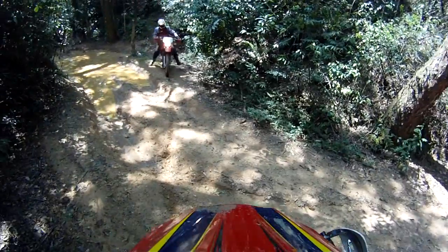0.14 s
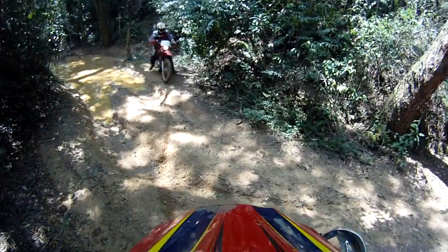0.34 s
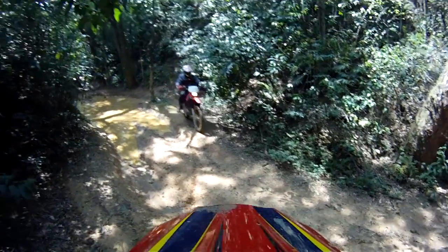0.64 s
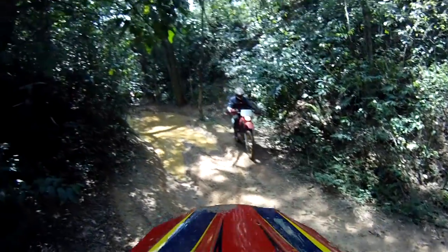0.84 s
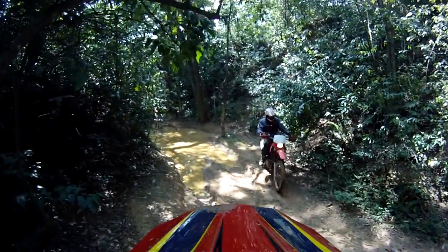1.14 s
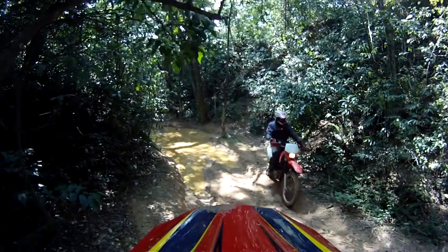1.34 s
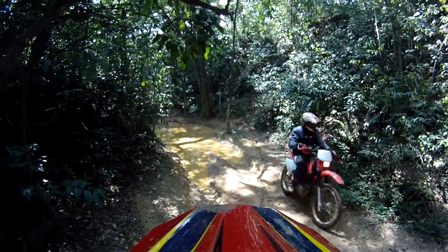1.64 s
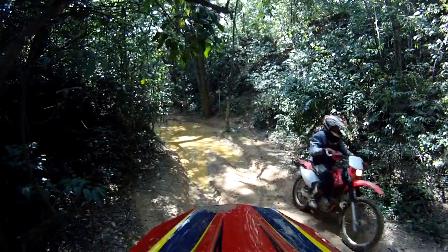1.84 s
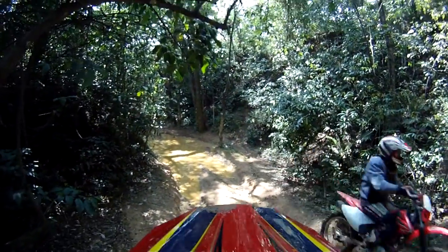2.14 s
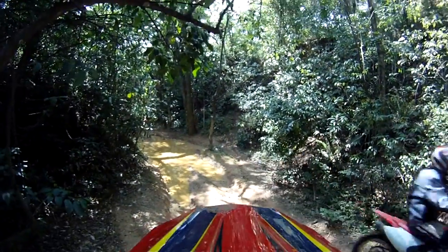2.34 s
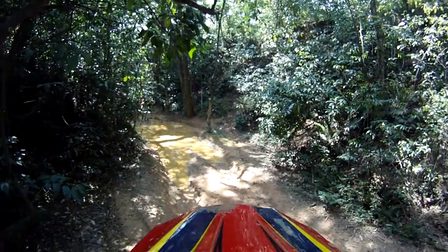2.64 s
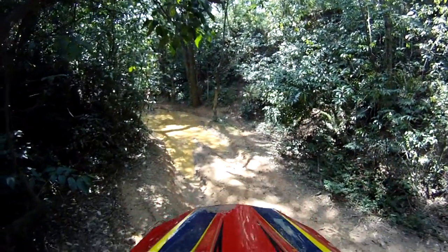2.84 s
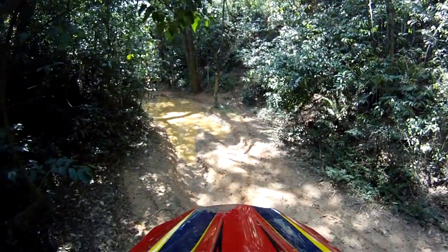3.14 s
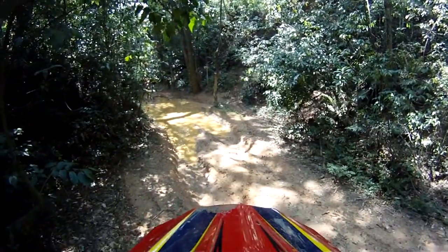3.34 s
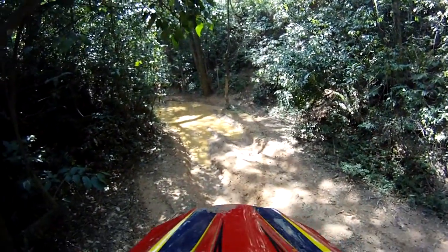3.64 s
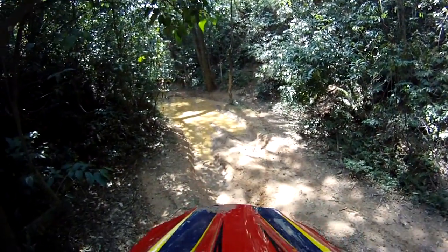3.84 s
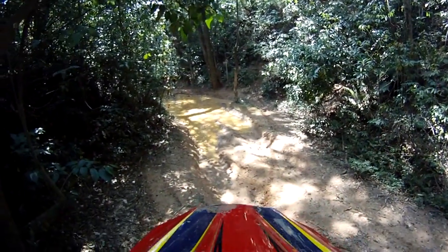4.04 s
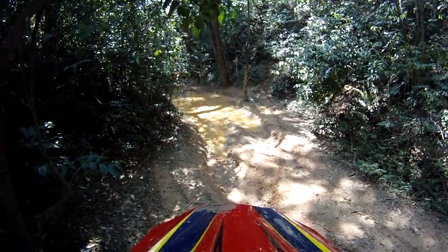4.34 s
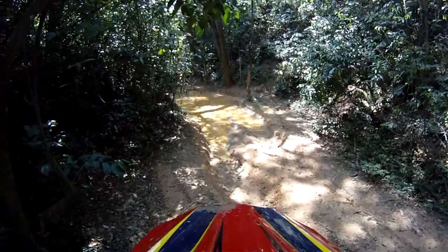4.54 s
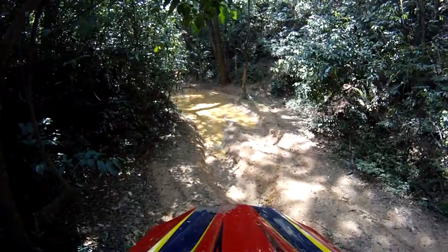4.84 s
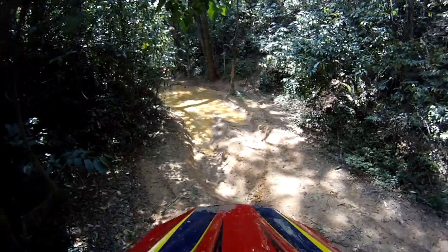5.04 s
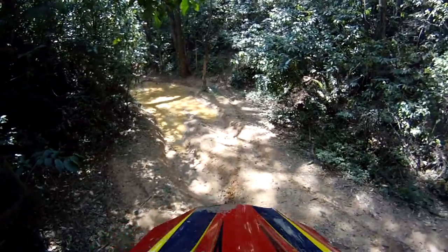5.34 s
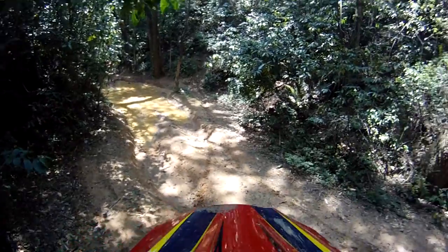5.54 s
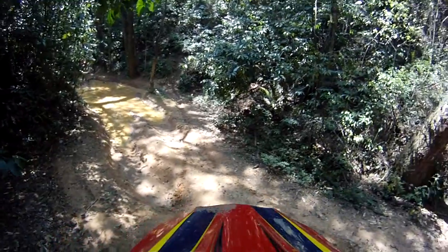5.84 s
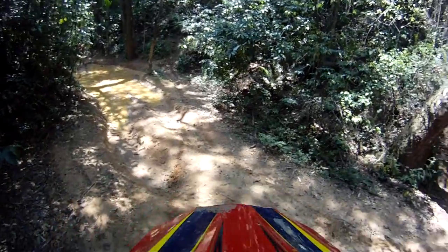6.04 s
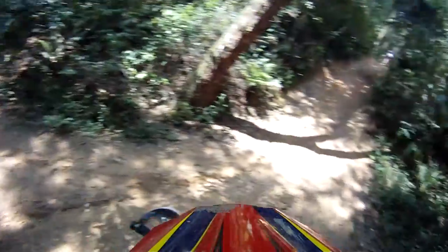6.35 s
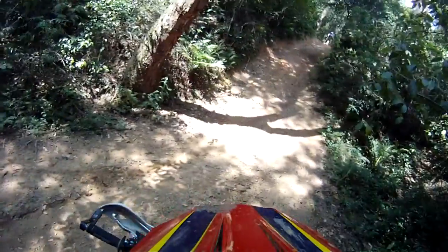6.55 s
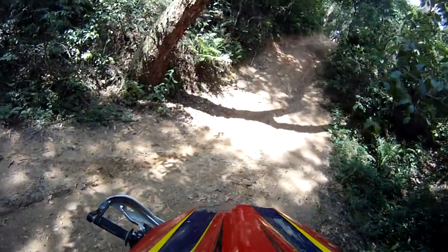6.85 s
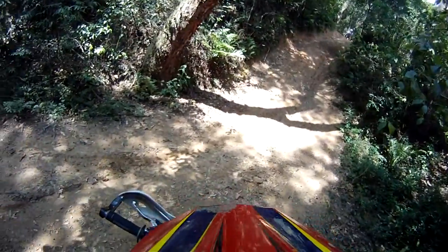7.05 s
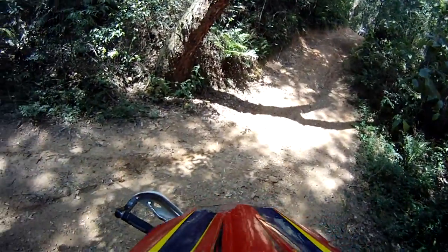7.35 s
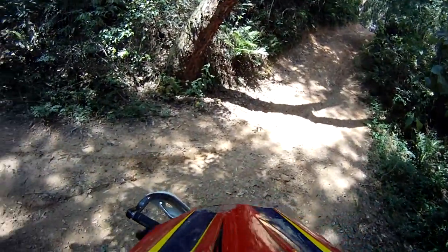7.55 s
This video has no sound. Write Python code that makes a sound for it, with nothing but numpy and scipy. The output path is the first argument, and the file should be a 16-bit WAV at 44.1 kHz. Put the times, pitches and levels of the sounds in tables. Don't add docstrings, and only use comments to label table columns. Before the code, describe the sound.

A muffled, boxy helmet microphone on a forest trail, with faint leafy hiss. From 0 to 0.4 s, low booming bumps and dry clicks shake the casing, strongest near 0.3 s. Beneath them a single-cylinder dirt bike drones low and uneven, dipping, then rising in pitch as it approaches from about 1 s. At 2.2 s a deep thump lands as it passes; immediately the exhaust opens into thudding, barking pulses, with softer bumps until 3 s. The engine holds around 3.3 s, then swells to a loud raspy full-throttle burst at 3.8-4.4 s. The throttle snaps shut, gears whir briefly, a small blip comes near 4.9 s, and the engine slows and recedes. Bumps return at 5.4 s, and a hard cluster of knocks and clicks with a tiny squeak comes around 5.9-6.1 s. Near quiet follows, then faint distant revs at 7 and 7.3 s, with a last blip at the end.

```python
import sys
import numpy as np
from scipy import signal
from scipy.fft import rfft, irfft, next_fast_len
from scipy.io import wavfile
from scipy.ndimage import uniform_filter1d, map_coordinates

SR = 44100
rng = np.random.default_rng(int(sys.argv[2]) if len(sys.argv) > 2 else 0)


def store_pcm(level_fs):
    pcm = np.round(np.clip(level_fs, -1, 1) * 32767).astype(np.int16)
    wavfile.write(sys.argv[1], SR, np.atleast_2d(pcm).T)


def volts(x):
    e = np.asarray(x, float) / 20
    return 10 ** e


N = 338688

# frequency_hz, density_db_per_hz
WOODS_HISS = [(71, -28), (120, -14), (196, -6.5), (294, -4.5), (341, -7.5), (1230, -17.5), (2180, -13),
              (2790, -22.5), (5100, -22.5), (5900, -28.5), (7670, -72), (13000, -120)]
# frequency_hz, t60_s
FOREST_DECAY = [(200, 0.54), (2000, 0.22), (6000, 0.095)]

# start_s, peak_db, pitch_hz, swell_ms
JOLTS = [(0.047, -32, 85.8, 48), (0.101, -25, 84, 24), (0.242, -19, 91.3, 15), (0.315, -8.5, 85.3, 11.7),
         (2.206, -5, 80.7, 10), (2.7, -22.5, 84.4, 15), (2.912, -22, 80, 15), (2.989, -17.5, 83.4, 13),
         (5.422, -16.5, 74, 11.3), (5.498, -44, 77, 12), (5.656, -26.5, 95.5, 14.7), (5.805, -29, 75.4, 13),
         (5.92, -20.5, 67.3, 17), (5.956, -14, 71.6, 10.5), (5.994, -11, 88.7, 11.6),
         (6.05, -29, 101.2, 29), (6.075, -7.5, 86, 9.1), (6.493, -60, 83.4, 8.5), (6.955, -43.5, 86.1, 12),
         (7.131, -46, 85.5, 15), (7.202, -41, 81, 12), (7.443, -47, 83.9, 18), (7.599, -41.5, 72.7, 14)]
# start_s, peak_db, pitch_hz, swell_ms
CASE_TAPS = [
    (.314, -29.5, 278, 4.1),
    (2.206, -27.5, 256, 6.4),
    (5.93, -59, 420, 9.6),
    (6.03, -26, 184.3, 23),
    (6.038, -37.5, 260.6, 24),
]
# start_s, peak_db, t60_s, treble_edge_db
CLICKS = [(0.068, -22, 0.015, -38), (0.105, -29, 0.018, -25), (0.217, -31.5, 0.062, -16),
          (0.248, -23, 0.03, -34), (0.317, -26.5, 0.067, -46), (0.329, -24.5, 0.021, -23),
          (0.35, -39.5, 0.46, -30), (2.206, -20, 0.045, -22), (5.742, -41, 0.054, -22),
          (5.955, -31.5, 0.018, -37), (5.974, -28, 0.035, -40), (5.989, -52, 0.018, -30),
          (6.014, -37, 0.031, -31), (6.033, -18, 0.016, -33), (6.042, -33, 0.07, -38),
          (6.053, -6.5, 0.028, -49), (6.065, -24, 0.024, -26), (6.071, -12, 0.013, -42),
          (6.086, -50, 0.016, -27), (6.097, -36, 0.018, -29)]
# frequency_hz, width_hz, level_db
MOUNT_MODES = [(530, 710, -3), (1300, 1400, -1), (2320, 850, 2.5), (3900, 250, -16)]
# start_s, length_s, pitch_hz, level_db
STRAP_SQUEAK = (5.899, .011, 2120, -42)
# centre_s, half_length_s, case_hum_db, slow_sway_db
HEAD_TURNS = [(0.097, 0.23, -32, -52), (0.331, 0.074, -21.5, -54), (1.197, 2.6, -49, -71),
              (2.25, 0.067, -45, -32), (2.47, 0.15, -32, -40), (2.592, 0.28, -37.5, -50),
              (3.015, 0.32, -47, -49), (3.358, 0.058, -62, -50), (4.456, 0.049, -62, -61),
              (4.76, 0.56, -50, -61), (5.453, 0.34, -40, -53), (5.795, 0.21, -64, -44.5),
              (6.015, 0.092, -17.5, -43), (6.54, 0.37, -65, -59), (6.958, 0.12, -63, -50.5),
              (7.23, 0.099, -68, -53), (7.449, 0.22, -59, -70), (7.68, 0.15, -68, -53)]

# time_s, firings_per_s
FIRING_RATE = [(0.0, 20.72), (0.6, 18.92), (1.19, 23.9), (1.64, 33.26), (2.24, 30.61), (2.37, 39.5),
               (2.63, 50.56), (2.79, 47.55), (3.41, 52.49), (3.59, 50.53), (3.84, 53.92), (4.01, 61.7),
               (4.34, 62.66), (4.62, 57.07), (4.76, 43.09), (4.92, 46.61), (5.46, 28.76), (6.2, 23.1)]
# time_s, firings_per_s
FAR_FIRING_RATE = [
    (6.299, 35),
    (6.951, 41),
    (7.1, 60),
    (7.302, 73),
    (7.5, 62),
    (7.68, 51),
]
# opens_s, rise_s, hold_s, fall_s, lift_db
THROTTLE_TWISTS = [
    (2.264, 0.057, 0.765, 0.22, 10.5),
    (2.36, .38, 0.062, 0.3, 5.5),
    (3.385, 0.17, .03, 0.076, 3),
    (3.735, 0.21, 0.43, 0.042, 9.5),
    (4.771, 0.18, 0.051, 0.043, 7.5),
    (6.955, 0.12, 0.067, 0.15, 15),
    (7.275, 0.082, 0.07, 0.14, 12.5),
    (7.61, .08, 0.11, .1, 5.5),
]
# time_s, echo_delay_ms, exhaust_facing_0_to_1, tailpipe_focus_hz, focus_share_0_to_1
PATH = [(0, 4, 0.22, 2300, 0.18), (2.2, 3.8, .05, 2300, 0.53), (2.35, 2.86, 0.54, 1500, 0),
        (2.55, 3.04, 0.47, 1330, 0.32), (2.75, 2.37, 0.84, 1680, 0.33), (3.03, 2.24, 1, 1820, 0.35),
        (3.14, 2.6, 0.78, 1600, 0.38), (3.3, 2.3, 0.68, 1500, 0.06), (3.55, 2.2, .77, 1190, 0.2),
        (3.97, 2.23, 0.92, 1950, 0.01), (4.39, 2.22, 0.78, 1830, .45), (4.45, 2.58, 0.58, 940, 0),
        (4.98, 2.2, 0.7, 860, 0.11), (5.1, 2.18, 0.8, 2300, 0.47), (5.8, 2.07, 0.76, 2300, 0.4),
        (6.05, 2.3, 0.36, 2300, 0), (7.2, 2.05, 0.42, 1400, .02)]
# time_s, level_db
SHUT_BARK = [(0, -43), (.2, -48), (.45, -51.5), (1, -50), (2.18, -43.5), (2.26, -44.5), (3.3, -36),
             (3.7, -35), (4.43, -36), (4.62, -47), (4.75, -51.5), (5.1, -48.5), (5.45, -54.5), (5.9, -62),
             (6.2, -69), (6.9, -77), (7.27, -64.5), (7.68, -57)]
# frequency_hz, density_db_per_hz
PIPE = [(25, -44), (55, -1), (120, 5.5), (190, -12), (300, -4), (400, -21), (600, -19), (900, -11),
        (1200, -46), (2000, -120)]
# frequency_hz at middle speed, level_db
INTAKE = [(40, -14), (80, -7), (105, -7.5), (140, 6), (165, -4), (200, -15), (260, -7.5), (320, -14.5),
          (420, -12), (650, -28.5)]
# frequency_hz, width_hz, level_db
CASE_MODES = [(1168, 790, 0), (1482, 142, 5.5), (1946, 470, -0.5), (2708, 510, -7.5), (3260, 340, -10),
              (4930, 430, -34), (5470, 160, -50)]
FOCUS_BANDS = [850, 1250, 1800, 2400]
# frequency_hz, width_hz, level_db
METAL_MODES = [(2300, 160, 10.5), (3680, 297, 2.5), (4580, 170, -6.5), (5350, 230, -6.5)]
# frequency_hz, width_hz, level_db
WHIR_MODES = [(1230, 160, -15), (1720, 140, -3), (2710, 170, -3), (4340, 550, -7), (5350, 230, 2)]
# multiple_of_firing_rate, level_db
GEAR_MESH = [(21, -5.5), (26, 2), (30, 0), (33, 5), (40, 0), (46, -4), (77, -19), (90, -22)]
# rise_s, hold_s, fall_s, level_db
COASTING = (0.07, .175, 0.07, -41)
# rise_s, hold_s, fall_s, level_db over the thud
TAIL_RING = (0.041, 1.147, .2, 3.2)
# rise_s, hold_s, fall_s, level_db over the bark there
RASP = (.12, .2, .22, 3)
# rise_s, hold_s, fall_s, level_db over the thud
THIRD_ORDER = (1, .62, -1, -7)

TAIL_BY_S, FULL_THROTTLE_S, COAST_S = 2.25, 3.85, 4.395


def unit(x):
    return x / np.sqrt(np.mean(x ** 2) + 1e-20)


def steady(x, seconds):
    power = uniform_filter1d(x ** 2, int(seconds * SR))
    return x / np.sqrt(np.abs(power) + 1e-12)


def along(points, hz):
    f, value = np.transpose(points)
    return np.interp(np.log(hz + 1), np.log(f + 1), value)


def curves(rows):
    s, *columns = np.transpose(rows)
    return [np.interp(np.arange(N) / SR, s, column) for column in columns]


def swell(s, rise, hold, fall):
    return np.interp(np.arange(N) / SR, np.cumsum([s, rise, hold, fall]), [0, 1, 1, 0])


def wobble(rate):
    knots = rng.standard_normal(int(N * rate / SR) + 4)
    return map_coordinates(knots, [np.arange(N) * rate / SR])


def noise():
    return rng.standard_normal(N)


def filtered(x, response):
    m = next_fast_len(N + SR // 2)
    return irfft(rfft(x, m) * response(np.fft.rfftfreq(m, 1 / SR)), m)[:N]


def causal(points):
    def response(hz):
        cepstrum = irfft(np.log(volts(along(points, hz)) + 1e-6))
        half = len(cepstrum) // 2
        cepstrum[1:half] *= 2
        cepstrum[half + 1:] = 0
        return np.exp(rfft(cepstrum))
    return response


def modes(table):
    def response(f):
        total = 0
        for k, (centre, width, db) in enumerate(table):
            damping = 1j * f * width
            total = total + (-1) ** k * volts(db) * damping / (centre * centre - f * f + damping)
        return total
    return response


def forest(x):
    hz, t, z = signal.stft(rng.standard_normal(SR // 2), SR, nperseg=256)
    decay = volts(-60 * t / along(FOREST_DECAY, hz)[:, None])
    tail = signal.istft(z * decay, SR, nperseg=256)[1]
    delayed = np.pad(x, (300, 0))
    return signal.fftconvolve(delayed, tail / np.linalg.norm(tail))[:N]


def woods():
    return volts(-62.5) * unit(filtered(noise(), causal(WOODS_HISS)))


def case_shaking():
    t = np.arange(N) / SR
    gains = volts(-66)
    for s, half_length, hum_db, sway_db in HEAD_TURNS:
        loss_db = 19 * abs(t - s) / half_length
        gains = gains + volts(np.array([[hum_db], [sway_db]]) - loss_db)
    hum = filtered(filtered(noise(), modes([(82.5, 27.6, 0)])), modes([(80.0, 101, 0)]))
    sway = filtered(filtered(noise(), modes([(27.2, 44, 0)])), modes([(28, 59, 0)]))
    return gains[0] * unit(hum) + gains[1] * unit(sway)


def mount_clicks():
    clicks, ticks, t = np.zeros(N + SR), np.zeros(N + SR), np.arange(SR // 4) / SR
    for s, db, t60, edge_db in CLICKS:
        burst = rng.standard_normal(len(t))
        start = round(s * SR)
        clicks[start:][:len(t)] += volts(db + 6.5 - 60 * t / t60) * burst
        ticks[start:][:len(t)] += volts(db + edge_db + 14 - 60 * t / 0.0099) * burst
    ring = filtered(filtered(clicks[:N], modes(MOUNT_MODES)), modes(MOUNT_MODES))
    return ring + filtered(ticks[:N], modes([(4500, 2500, 0)]))


def case_booms():
    booms, t = np.zeros(N + SR), np.arange(SR // 4) / SR
    for s, db, hz, swell_ms in [*JOLTS, *CASE_TAPS]:
        u = t * 1000 / swell_ms
        envelope = (u * np.exp(1 - u)) ** 1.12
        booms[round(s * SR):][:len(t)] -= volts(db) * envelope * np.sin(2 * np.pi * hz * t)
    s, length, hz, db = STRAP_SQUEAK
    envelope = np.exp(-((t - length) / (0.55 * length)) ** 2)
    booms[round(s * SR):][:len(t)] += volts(db) * envelope * np.sin(2 * np.pi * hz * t * (1 + 2.5 * t))
    return booms[:N]


def helmet():
    return case_booms() + mount_clicks() + case_shaking()


def shaft_noise(turns, facing):
    beat = 1 + 0.36 * facing * np.cos(2 * np.pi * turns) + 0.15 * np.cos(4 * np.pi * turns)
    return beat * noise()


def metal_clatter(turns, facing):
    return unit(filtered(shaft_noise(turns, facing), modes(METAL_MODES)))


def coasting_whir(turns, facing):
    wide = [(hz, 3 * width, 0) for hz, width, _ in WHIR_MODES]
    gear_noise = filtered(filtered(shaft_noise(turns, facing), modes(WHIR_MODES)), modes(wide))
    mesh = 0
    for k, db in GEAR_MESH:
        mesh = mesh + volts(db) * (.8 + .6 * wobble(30)) * np.sin(2 * np.pi * k * turns)
    return unit(gear_noise) + volts(-1.5) * unit(mesh)


def blast_train(rate, turns):
    fired = np.flatnonzero(np.diff(np.floor(turns)))
    time_luck, level_luck = rng.standard_normal((2, len(fired)))
    uneven_db = .8 + .15 * np.maximum(40 - rate[fired], 0)
    blasts = np.zeros(N)
    blasts[np.clip(fired + (3 * time_luck).astype(int), 0, N - 1)] = volts(uneven_db * level_luck)
    return blasts


def intake_drone(rate, turns):
    drift = [volts(2.2 * wobble(3)) for _ in range(5)]
    slow_rate = rate[::64]
    lifted = slow_rate * (25 / slow_rate) ** 0.55
    orders = 0
    for k in range(2, 26):
        gain = np.repeat(volts(along(INTAKE, k * lifted)), 64)[:N]
        phase = 2 * np.pi * (k * turns + rng.standard_normal())
        orders = orders + drift[k % 5] * gain * np.sin(phase)
    return steady(orders, 0.064)


def exhaust_thud(blasts, rate, turns, facing):
    pipe = steady(filtered(blasts, causal(PIPE)), .15)
    approaching = np.arange(N) < TAIL_BY_S * SR
    drone_share = np.where(approaching, 1, 0.47)
    thud = facing * pipe + (1 - facing) * drone_share * intake_drone(rate, turns)
    *shape, db = TAIL_RING
    ring = steady(filtered(blasts, modes([(302.3, 92, 0)])), .15)
    thud = thud + volts(db - 8.5) * swell(TAIL_BY_S, *shape) * ring
    *shape, db = THIRD_ORDER
    thud = thud + volts(db) * swell(FULL_THROTTLE_S, *shape) * np.sin(2 * np.pi * 3 * turns)
    return steady(thud + volts(-12) * forest(thud), .15)


def muffler_chirp(f):
    spread_ms, knee_hz, early_ms = 2.545, 1774, 1.599
    phase = spread_ms * (np.hypot(f, knee_hz) - knee_hz) - early_ms * f
    return np.exp(-2j * np.pi / 1000 * phase)


def gas_turbulence(blasts, facing, bark_ms):
    now = np.arange(N)
    last = np.maximum.accumulate(np.where(blasts > 0, now, 0))
    age = (now - last) / (SR / 1000 * bark_ms)
    gate = facing * blasts[last] * age * np.exp(1 - age) + (1 - facing) * .5
    return steady(gate * noise(), 0.038)


def ground_echoes(bark, facing, echo_ms):
    now = np.arange(N)
    delay = (echo_ms + .05 * wobble(7)) * SR / 1000
    ground = facing * np.interp(now - 0.922 * delay, now, bark)
    bank = facing * np.interp(now - 2.7 * delay, now, bark)
    return bark + 0.69 * ground + 0.41 * bank


def tailpipe_beam(bark, focus_hz, focus):
    place = np.interp(focus_hz, FOCUS_BANDS, np.arange(len(FOCUS_BANDS)))
    beam = 0
    for k, hz in enumerate(FOCUS_BANDS):
        beam = beam + np.clip(1 - abs(place - k), 0, 1) * filtered(bark, modes([(hz, 0.16 * hz, 0)]))
    return (1 - focus) * bark + focus * 4.2 * beam


def exhaust_bark(blasts, rate, load_db, bark_db):
    echo_ms, facing, focus_hz, focus = curves(PATH)
    rough = 1 - facing ** 2 * (.45 + .045 * load_db) + .03 * np.maximum(rate - 50, 0)
    rough = np.clip(rough, 0, 1)
    bark_ms = np.clip(2 * np.exp(-.075 * (bark_db + 35)), .4, 6)
    pulses = filtered(blasts, modes([(1500, 6100, 0)]))
    pulses = filtered(pulses, lambda f: muffler_chirp(f) * modes([(1600, 2600, 0)])(f))
    bark = np.sqrt(1 - rough) * steady(pulses, 0.12)
    bark = bark + np.sqrt(rough) * gas_turbulence(blasts, facing, bark_ms)
    bark = filtered(ground_echoes(bark, facing, echo_ms), modes(CASE_MODES))
    bark = tailpipe_beam(bark, focus_hz, focus)
    *shape, db = RASP
    rasp = filtered(bark, modes([(3220, 630, 0.012)]))
    bark = bark + volts(db) * swell(FULL_THROTTLE_S, *shape) * rasp
    return steady(bark + volts(-14) * forest(bark), .12)


def bike():
    flywheel_s = .08
    rate = uniform_filter1d(curves([*FIRING_RATE, *FAR_FIRING_RATE])[0], int(flywheel_s * SR))
    turns = np.cumsum(rate) / SR + .17
    facing = curves(PATH)[1]
    load_db = sum(db * swell(*shape) for *shape, db in THROTTLE_TWISTS)
    shut_db = curves(SHUT_BARK)[0]
    bark_db = shut_db + load_db
    thud_db = -40.5 + .85 * (shut_db + 35) + 0.61 * load_db + 7 * swell(-1.05, 0.92, 1.21, 0.6)
    clatter_db = -44 + 0.73 * (bark_db + 36)
    *shape, whir_db = COASTING
    whir_gain = volts(whir_db) * swell(COAST_S, *shape) ** 2
    blasts = blast_train(rate, turns)
    mix = whir_gain * coasting_whir(turns, facing)
    mix = mix + volts(clatter_db) * metal_clatter(turns, facing)
    mix = mix + volts(thud_db) * exhaust_thud(blasts, rate, turns, facing)
    return mix + volts(bark_db - 0.85) * exhaust_bark(blasts, rate, load_db, bark_db)


def scene():
    return (woods() + helmet() + bike())[None]


def roll_off(x):
    return signal.sosfilt(signal.butter(12, 15950, fs=SR, output="sos"), x)


def record(dry):
    held_hz, hold = 12000, 4
    power = uniform_filter1d(dry ** 2, int(0.0565 * SR), origin=int(0.02 * SR))
    loudness = np.sqrt(np.abs(power))[0]
    x = dry[0] / (1 + loudness / 1.07)
    x = filtered(x, lambda hz: 1 / np.sqrt(1 + (hz / 5650) ** 30))
    held = np.repeat(signal.resample(x, N * held_hz // SR), hold)
    mix = filtered(signal.resample(held, N), lambda hz: 1 / (1 + (hz / 15300) ** 40))
    return roll_off(mix[None])


dry = scene()
out = record(dry)
store_pcm(out)
```